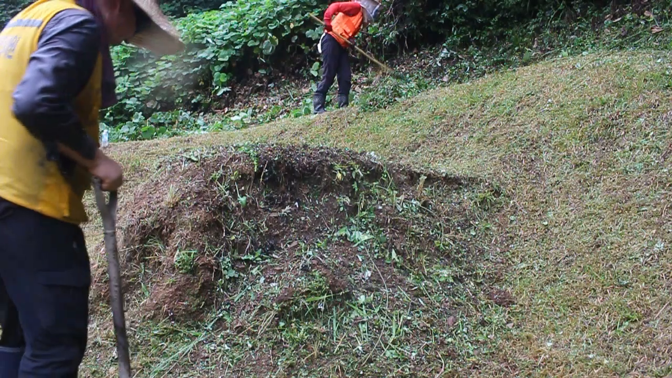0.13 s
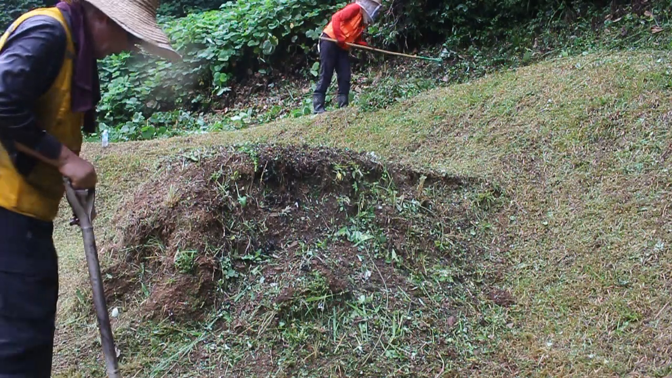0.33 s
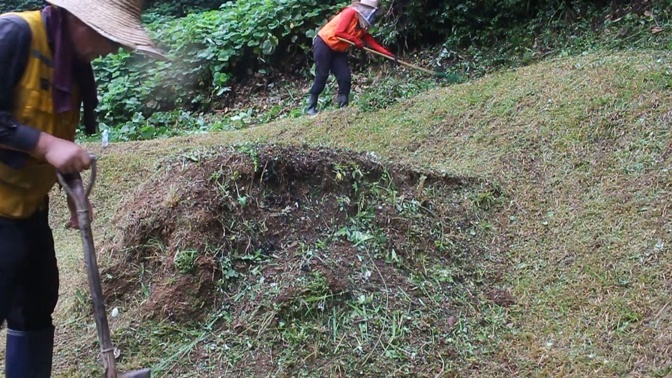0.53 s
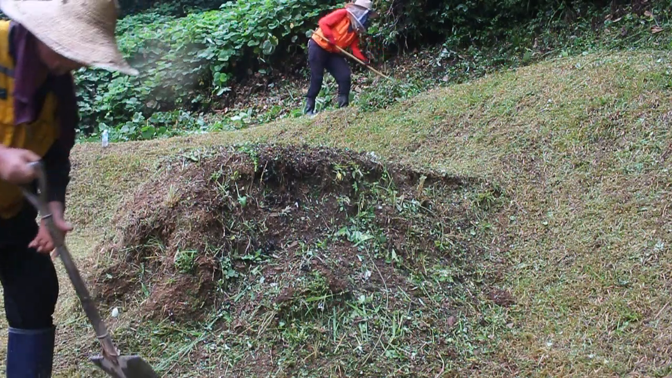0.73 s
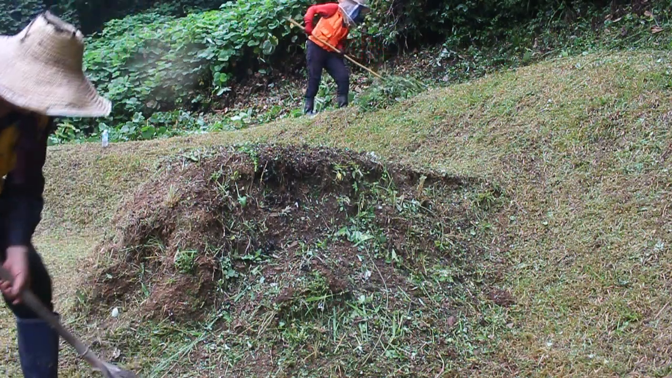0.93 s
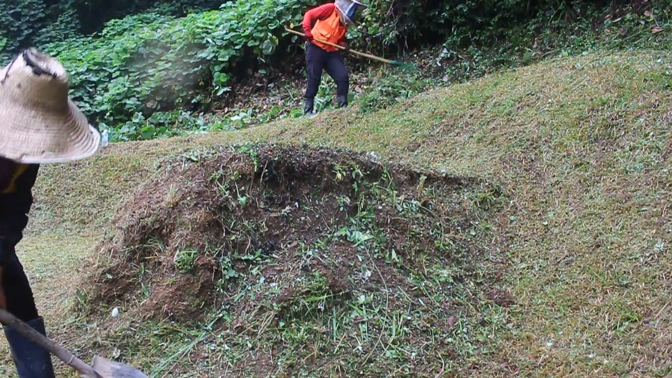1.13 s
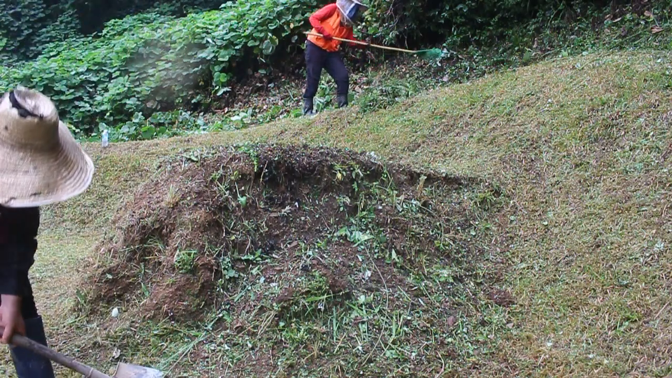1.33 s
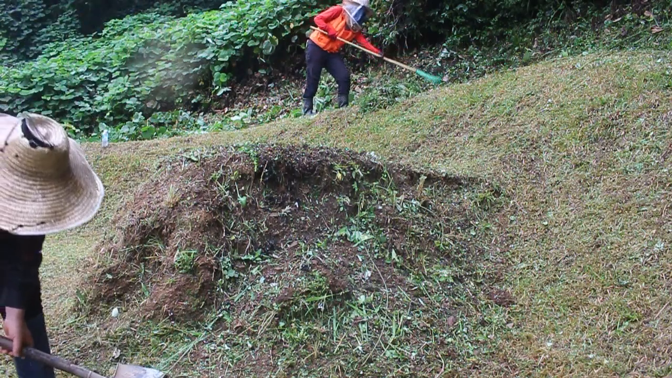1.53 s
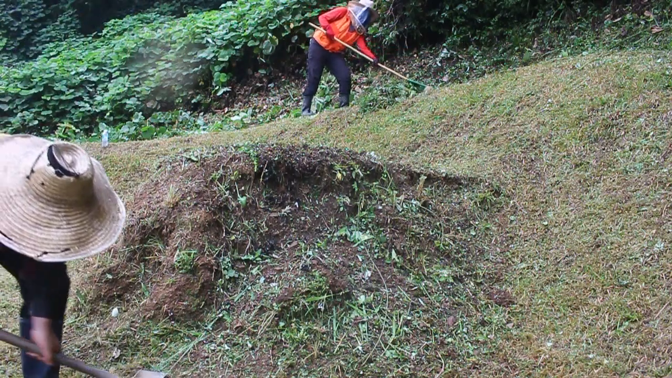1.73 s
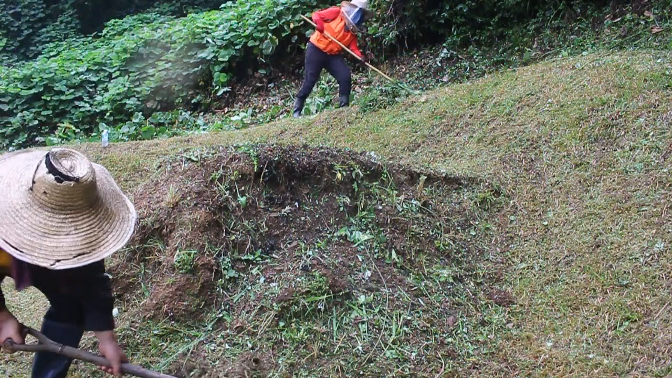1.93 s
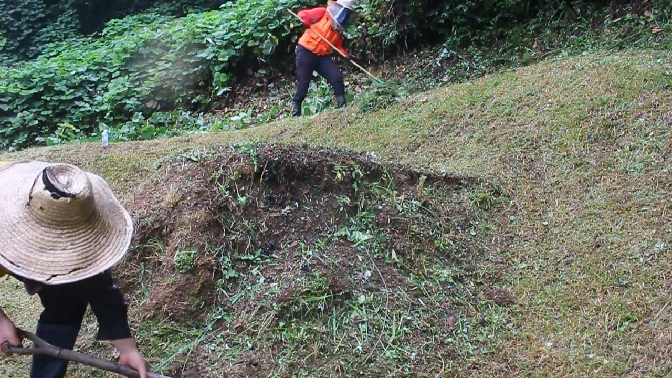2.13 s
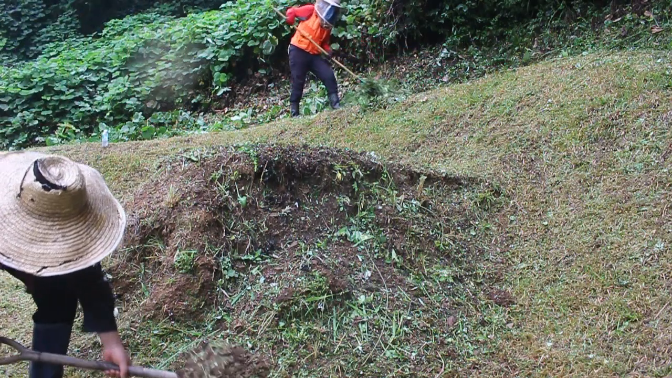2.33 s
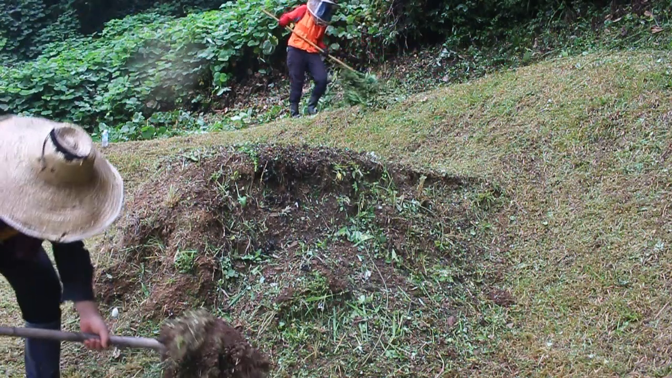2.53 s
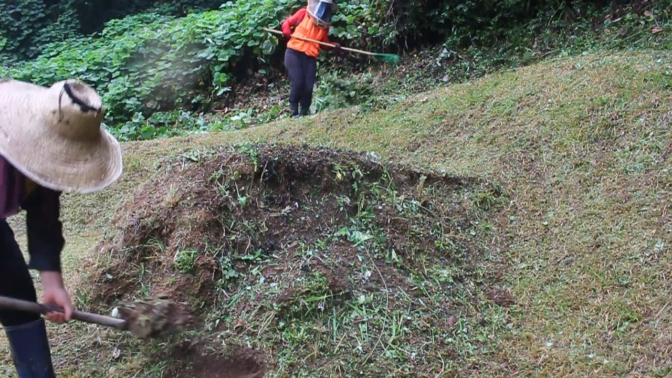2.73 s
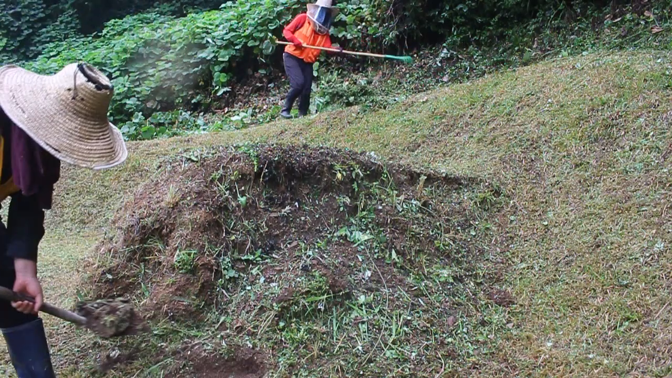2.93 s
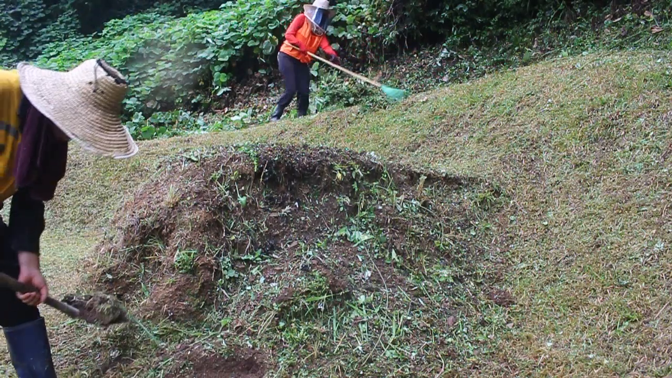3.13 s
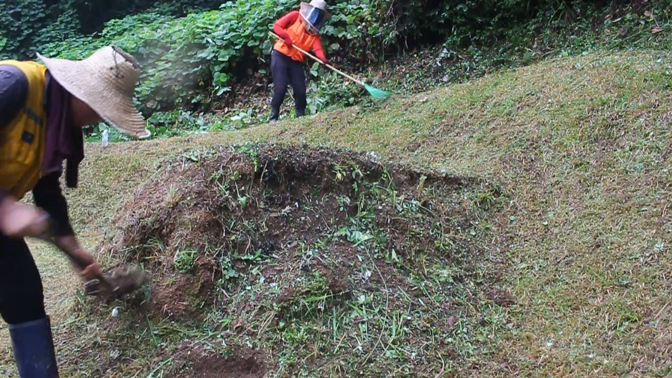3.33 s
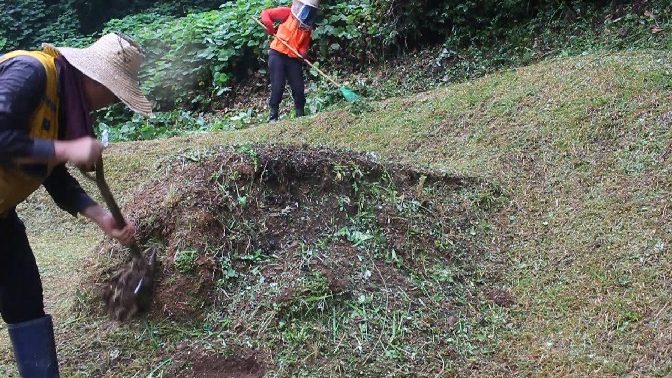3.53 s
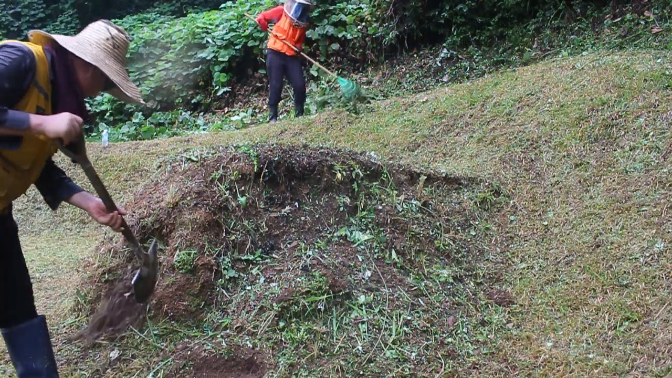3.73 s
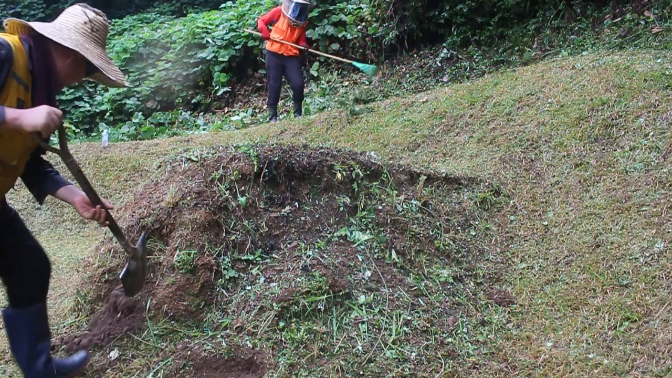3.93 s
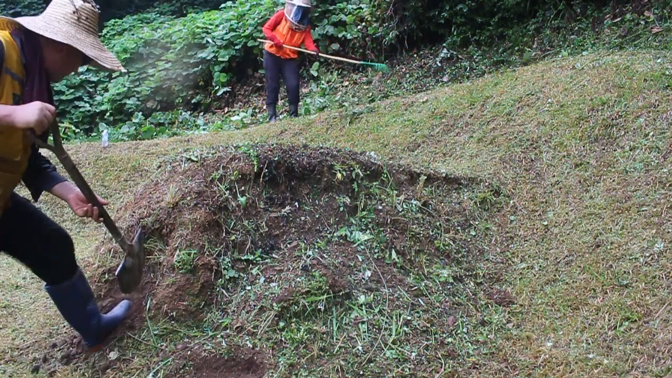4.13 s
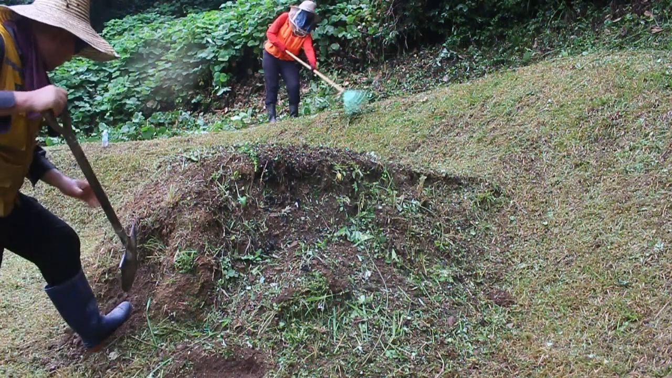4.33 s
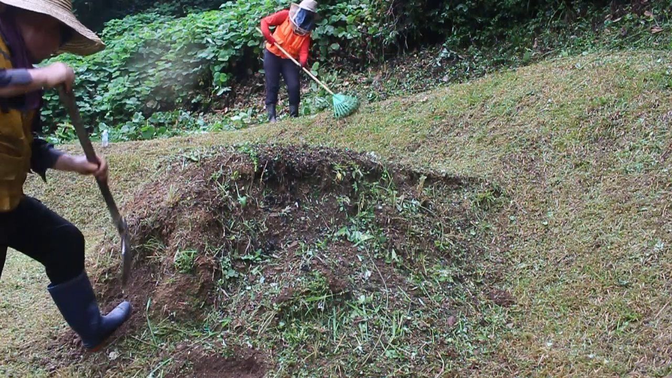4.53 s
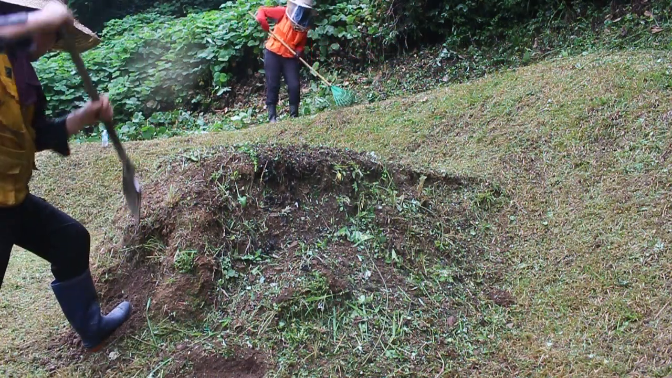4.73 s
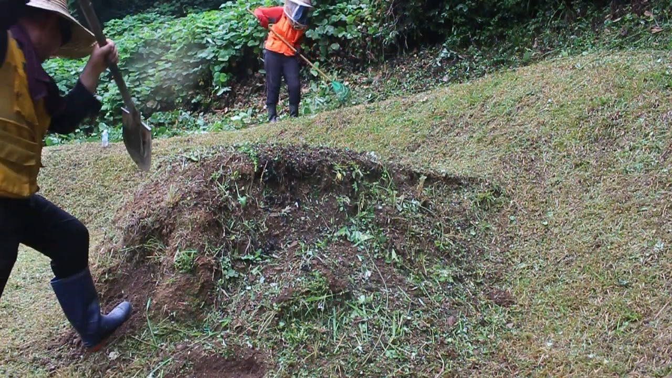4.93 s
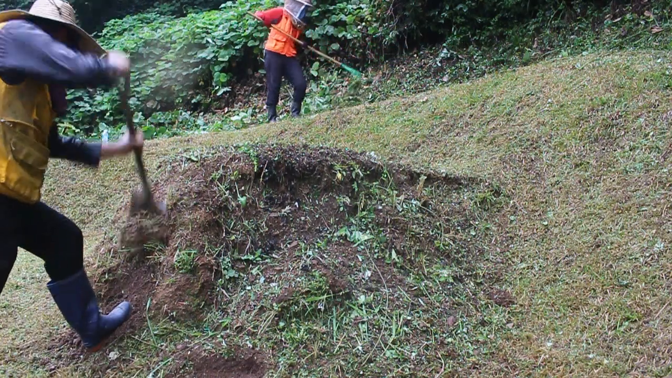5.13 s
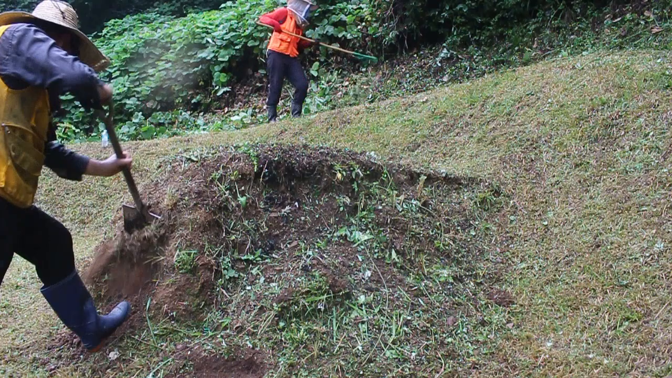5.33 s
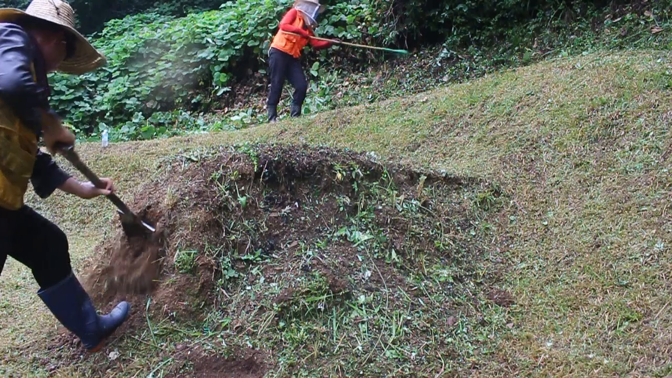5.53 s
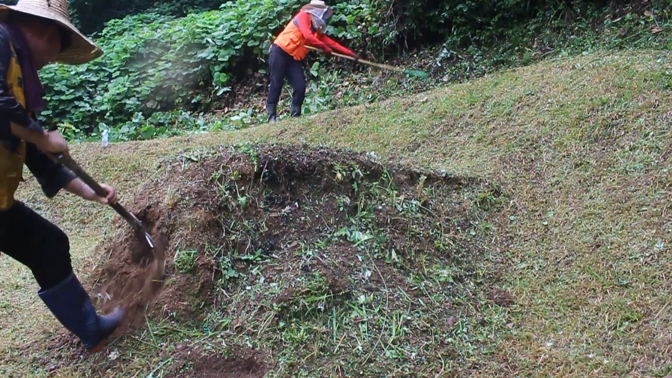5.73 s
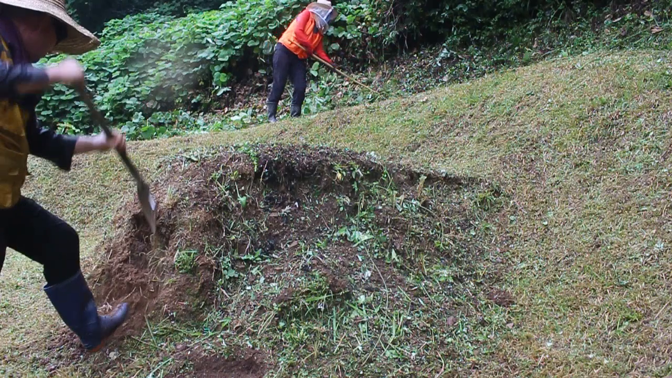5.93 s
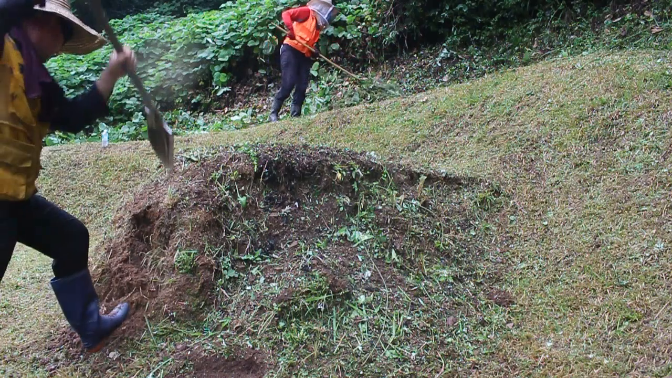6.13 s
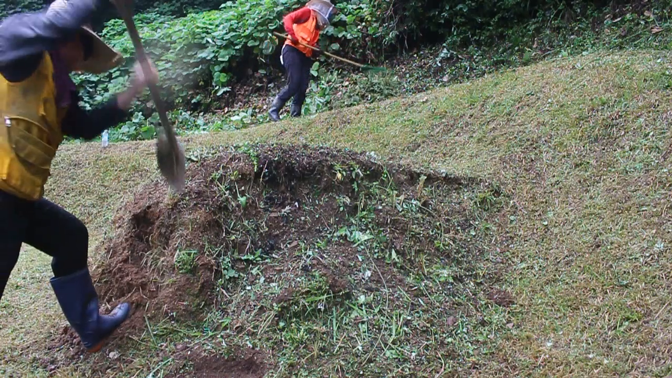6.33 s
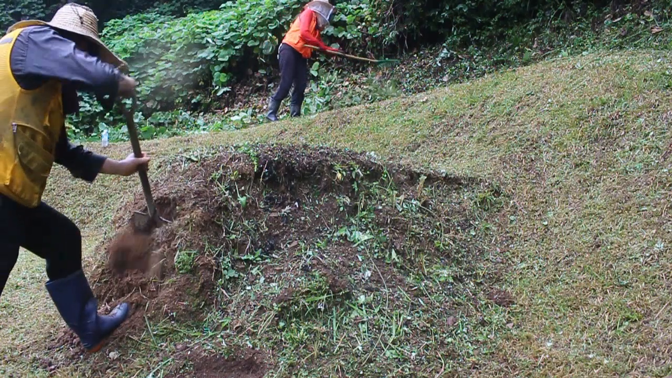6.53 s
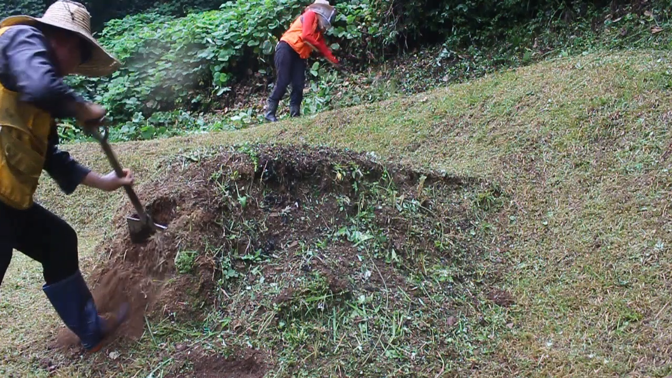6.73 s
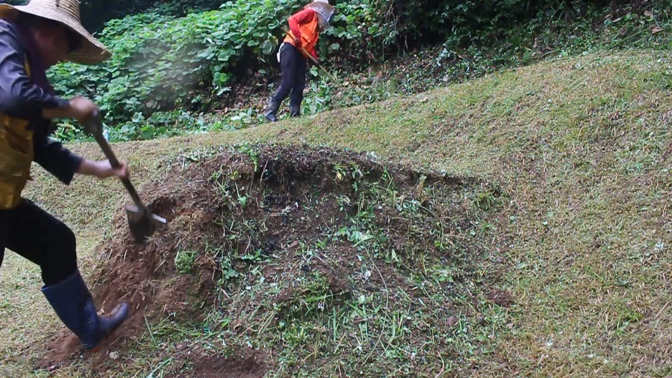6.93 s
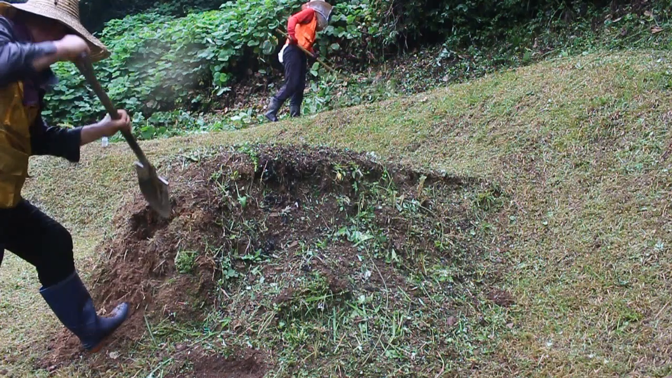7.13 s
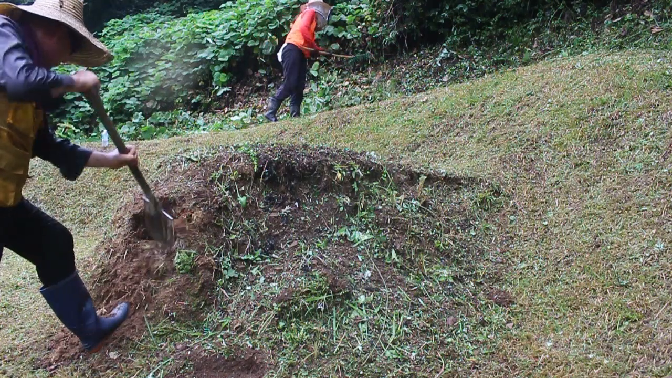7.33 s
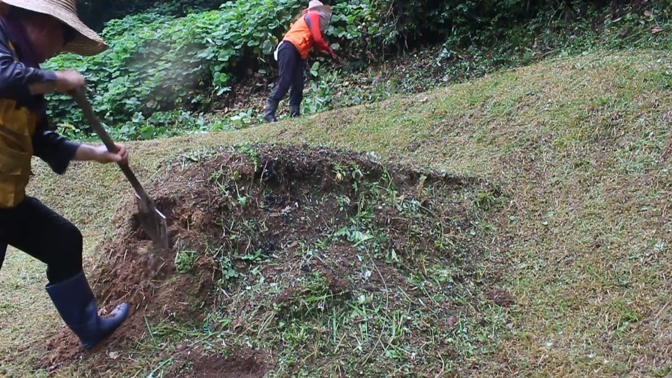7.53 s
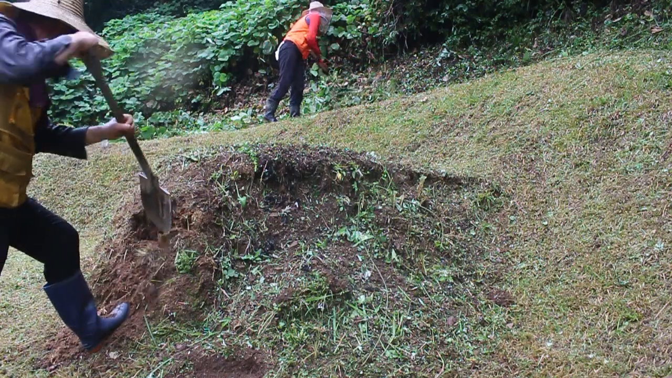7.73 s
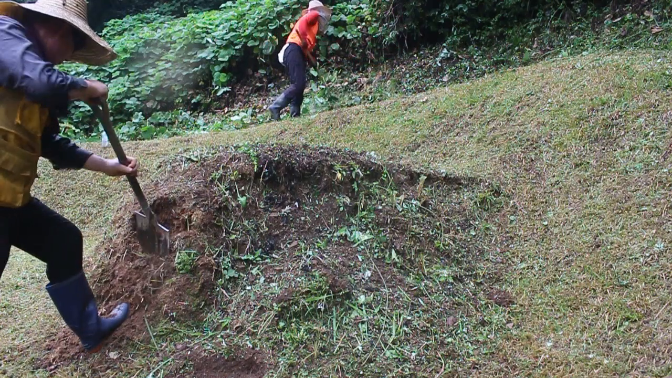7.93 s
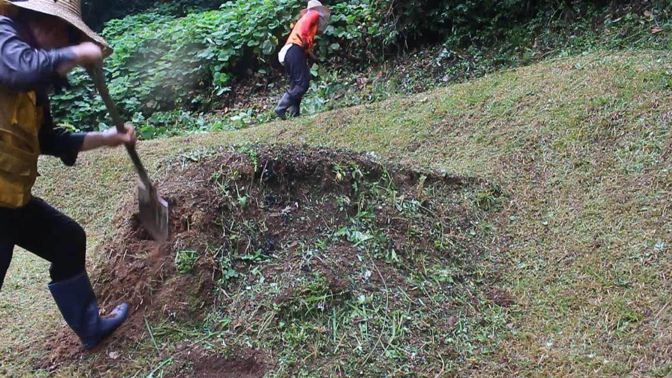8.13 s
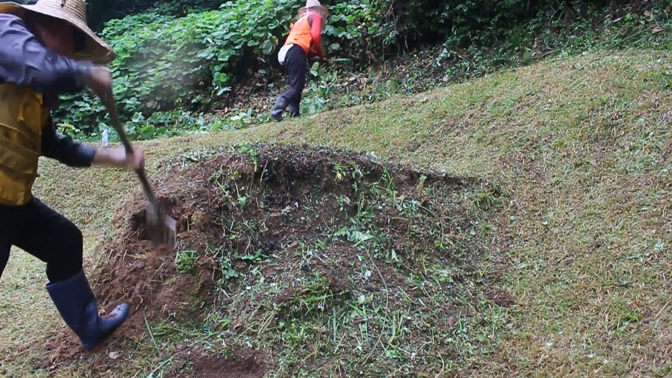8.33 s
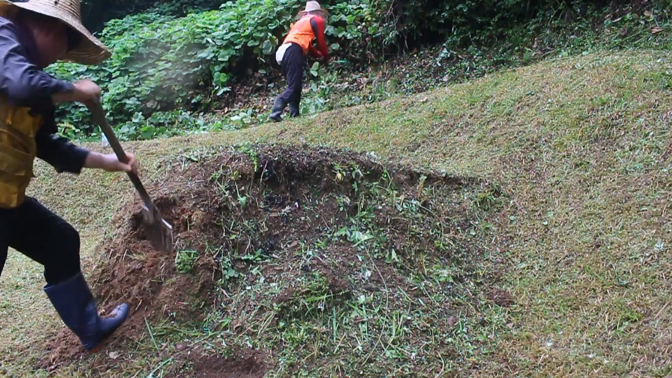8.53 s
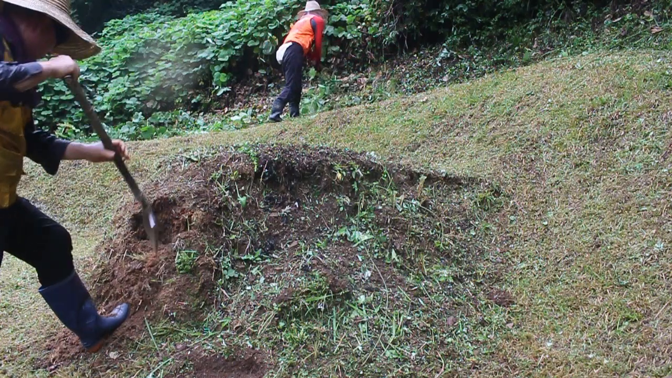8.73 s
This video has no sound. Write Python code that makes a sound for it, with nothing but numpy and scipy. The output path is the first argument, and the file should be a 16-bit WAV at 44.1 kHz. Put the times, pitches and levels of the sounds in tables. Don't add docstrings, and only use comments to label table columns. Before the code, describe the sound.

A close, dry, nearly mono outdoor sound of a shovel in stony soil. From 0 to 1 second the blade drags lightly through turf, with a sharp stone knock at 0.3. A short crunch at 1.3 leads to a dense grinding push at 1.7-2.0, full of cracking pebbles. Softer drags follow, with a faint bee hum around 2.3-2.8 and a weaker one near 4.5. At 3.5-3.7 gritty scrapes leave the steel briefly ringing; then it is mostly quiet, with small knocks. A hard stab crunches at 5.15, lighter scrapes follow to 5.9, and the loudest stab, with clustered stone knocks, hits at 6.43-6.55. Soil crumbles down. A dry double clack on buried rock comes at 7.43, then sandy skims at 7.9 and, stronger, 8.4, ending in light scrapes. Thin high cicadas and soft air hiss continue throughout, the highest chorus fading after 5.

```python
import sys
import numpy as np
from scipy import signal
from scipy.fft import rfft, irfft
from scipy.io import wavfile
from scipy.ndimage import uniform_filter1d

SR = 44100
rng = np.random.default_rng(int(sys.argv[2]) if len(sys.argv) > 2 else 0)


def to_wav(s):
    ch = np.atleast_2d(s).T
    pcm = np.round(np.clip(ch, -1, 1) * 32767)
    wavfile.write(sys.argv[1], SR, pcm.astype(np.int16))


def elevation(decibels):
    levels = np.asarray(decibels, float)
    return 10 ** (levels / 20)


N = 388080
TIME = np.arange(N) / SR
FREQS = np.maximum(np.arange(N // 2 + 1) * SR / N, 1)

# (t/s, grit level/dB, swell/s, fade/s, hold/s)
PUSHES = [
    (1.265, -28, .06, .065, .046),
    (1.73, -34, .03, .3, .001),
    (1.85, -24.3, .14, .17, .042),
    (5.156, -19.5, .006, .028, .08),
    (6.426, -16.5, .009, .03, .07),
    (6.543, -28.5, .13, .05, .001),
]
SAG_DB_PER_S = 105
# (t/s, grit level/dB, swell/s, fade/s)
DRAGS = [(.05, -54, .6, .6), (.279, -40, .23, .45), (.71, -51, .07, .9), (.954, -38.5, .04, .1),
         (1.109, -39.5, .26, .3), (2.111, -40, .21, .4), (2.6, -58, .6, .6), (2.909, -36.5, .17, .26),
         (3.46, -38, .015, .25), (3.55, -41, .03, .3), (3.702, -38, .04, .19), (3.86, -52, .21, .55),
         (4.871, -50, .9, .24)]
# (t/s, grit level/dB, swell/s, fade/s)
SCRAPES = [(3.49, -39, .05, .05), (4.466, -45, .01, .15), (5.29, -54, .05, .6), (5.54, -46.5, .23, .45),
           (5.633, -37.5, .08, .22), (5.724, -32.5, .035, .04), (5.865, -42, .055, .22),
           (7.744, -46.5, .21, .15), (8.116, -47.5, .13, .21), (8.598, -45, .1, .09), (8.77, -45, .17, .3)]
# (t/s, grit level/dB, swell/s, fade/s)
SKIMS = [
    (3.628, -32, .09, .04),
    (7.04, -45, .21, .12),
    (7.306, -40, .01, .28),
    (7.895, -32, .055, .08),
    (8.372, -34, .015, .12),
    (8.4, -26, .04, .05),
    (8.421, -23.5, .035, .03),
]
# (t/s, grit level/dB, swell/s, fade/s)
CRUMBLES = [(1.9, -40, .2, .17), (4.163, -42, .03, .05), (5.41, -54, .21, .45), (5.99, -53, .1, .6),
            (6.62, -57, .05, .21), (6.76, -42, .06, .2), (6.83, -45, .07, .1), (6.94, -42.5, .1, .15),
            (7.22, -51, .45, .45), (7.46, -53, .21, .15)]
# (clods level/dB, pebbles level/dB, fine sand level/dB)
SOILS = [
    (-23, -8, -4.5),
    (-10, -4, -6),
    (-21, -11, -8),
    (-26, -10, .5),
    (-5, -.6, -10),
]
# (f/Hz, level/dB per Hz)
GRIT_COLOUR = [(35, -54), (60, -25), (371, -7), (503, -6), (803, -9), (946, -11), (1110, -8.5), (1660, -2),
               (1820, -5.5), (3340, -6), (10300, -7.5), (13900, -16), (16000, -31)]
# (f/Hz, width/Hz, level/dB)
BLADE_MODES = [(575, 106, -5), (782, 89, -2), (1130, 60, -4.5), (1374, 92, -1), (1510, 44, 1),
               (1690, 58, -5), (2015, 160, 0.5), (2290, 54, 2), (2800, 49, 0), (3030, 50, 2),
               (3270, 70, -3), (3680, 50, -5), (4280, 55, -15), (5040, 70, -6.5)]

# (t/s, peak level/dB, f/Hz, t60/s)
TURF_STONES = [(.193, -27, 1700, .049), (.259, -32, 1420, .033), (.275, -13.5, 1480, .018),
               (.331, -29.5, 3100, .053), (.946, -29, 3250, .081), (1.299, -19.5, 1530, .081),
               (1.677, -29, 1330, .032), (1.722, -20, 2420, .031), (1.8555, -10, 2030, .025),
               (1.898, -15, 1690, .074), (2.415, -23.5, 1340, .023), (2.597, -37, 1650, .03),
               (2.772, -33, 1480, .042), (2.934, -26, 2320, .044), (3.457, -24, 1250, .027),
               (3.542, -24, 1580, .081), (3.693, -25, 4150, .04), (4.462, -25, 2070, .033),
               (4.867, -35, 3940, .03)]
# (t/s, peak level/dB, f/Hz, t60/s)
BURIED_STONES = [(5.174, -12.5, 1630, .035), (5.204, -15, 1500, .03), (5.394, -34, 2830, .037),
                 (5.513, -33, 1460, .033), (5.532, -31, 2470, .045), (5.558, -31.5, 2800, .037),
                 (6.439, -7, 1120, .026), (6.457, -6, 1430, .027), (6.494, -2, 1550, .028),
                 (6.519, -17, 1540, .033), (6.538, -10.5, 1470, .031), (6.774, -31, 1480, .02),
                 (6.785, -20.5, 1580, .018), (7.512, -18, 2220, .026), (7.74, -32, 3840, .04),
                 (7.952, -30.5, 4970, .043), (8.364, -27, 4670, .051), (8.391, -15, 3220, .04),
                 (8.398, -15, 3000, .033), (8.419, -12, 1500, .038), (8.689, -37, 1870, .028),
                 (8.714, -28, 2140, .05)]
# (t/s, peak level/dB, f/Hz, t60/s)
CHIPS = [(.672, -35, 1630, .032), (1.226, -29, 2200, .04), (1.243, -23, 2190, .09),
         (1.785, -22, 1295, .055), (2.837, -38, 1920, .04), (3.602, -27.5, 3050, .1),
         (3.624, -25, 3000, .04), (4.312, -33, 1020, .029), (5.151, -5.5, 2100, .047),
         (5.612, -32, 2430, .05), (5.626, -29.5, 2240, .046), (5.669, -32, 3530, .03),
         (5.714, -30.5, 1610, .061), (5.858, -30.5, 2790, .061), (5.935, -23, 4840, .013),
         (6.424, -11, 1130, .05), (6.63, -38, 1500, .023), (6.999, -34, 2900, .034),
         (7.309, -28, 3640, .05), (7.375, -31, 1510, .064), (7.726, -35, 1590, .04),
         (7.862, -36, 3630, .065), (7.885, -21.5, 2530, .054), (8.116, -33, 3030, .04),
         (8.538, -31, 1530, .044)]
# (t/s, peak level/dB, f/Hz, t60/s)
CLODS = [(.164, -36, 2500, .036), (.439, -35, 1590, .03), (1.103, -34, 1350, .047), (1.416, -36, 1450, .04),
         (2.062, -26, 1060, .042), (2.091, -33, 1530, .058), (2.741, -41, 1500, .065),
         (3.494, -29, 2230, .037), (3.624, -28, 2900, .037), (3.929, -36, 1580, .035),
         (4.145, -32, 800, .08), (4.242, -31, 958, .025), (5.365, -22, 910, .016), (5.908, -35, 3530, .063),
         (6.73, -35.5, 1670, .035), (6.847, -33, 1690, .032), (6.925, -42, 1970, .032),
         (6.938, -28, 1670, .037)]
# (thud level/dB, snap level/dB)
VOICES = [
    (-21, -18),
    (-23, -15),
    (-27, -5),
    (-5, -16),
]

# (t/s, peak level/dB, f/Hz)
PEBBLE_CRACKS = [(1.2486, -20, 4180), (1.2529, -24, 2200), (1.2651, -22, 4180), (1.2687, -23, 2260),
                 (1.2733, -23, 1360), (1.3131, -25, 1490), (1.745, -28, 1980), (1.7758, -25, 5560),
                 (1.7882, -18, 3510), (1.8008, -23, 3750), (1.8125, -20, 3570), (1.8216, -20, 3660),
                 (1.8315, -20, 1960), (1.838, -16, 2000), (1.8486, -18, 2760), (1.8628, -20, 1940),
                 (1.8711, -22, 1490), (1.8903, -19, 3060), (1.8949, -22, 2630), (1.9024, -19, 2480),
                 (1.9077, -23, 1720), (1.9111, -23, 1640), (1.9301, -25, 3140), (1.9387, -23, 3360),
                 (1.9514, -25, 2130), (1.9573, -27, 4030), (1.969, -28, 3900), (1.9873, -30, 1310),
                 (1.9942, -27, 600), (2.013, -30, 1590), (2.0172, -33, 620), (2.876, -31, 2220),
                 (2.8801, -34, 1490), (2.911, -27, 3550), (2.9288, -32, 1360), (2.9355, -28, 2280),
                 (2.9438, -32, 2630), (2.9646, -34, 5020), (3.4614, -24, 1290), (3.4666, -31, 1290),
                 (3.4965, -30, 3340), (3.5045, -30, 4970), (3.5465, -28, 2200), (3.5516, -25, 2930),
                 (3.5877, -30, 4440), (3.6093, -24, 5040), (3.6263, -20, 3010), (3.6314, -23, 4930),
                 (3.6441, -29, 2860), (3.7093, -27, 4180), (3.7141, -27, 4180), (3.7287, -31, 1590),
                 (5.1564, -5, 2670), (5.1607, -16, 2000), (5.1651, -14, 1590), (5.1717, -8, 3340),
               (5.1902, -18, 2890), (5.1936, -22, 1590), (5.197, -20, 3290), (5.2099, -18, 1360),
               (5.2168, -21, 3340), (5.2302, -19, 2930), (5.2344, -24, 3600), (5.2379, -22, 3120),
               (5.6003, -39, 5060), (5.6119, -32, 2390), (5.6154, -35, 3450), (5.6263, -29, 2300),
               (5.6385, -30, 1440), (5.6689, -34, 2430), (5.6875, -37, 3600), (5.7169, -28, 3640),
               (5.7206, -28, 4440), (5.7345, -30, 3700), (6.4202, -16, 5810), (6.4273, -4, 1380),
               (6.4324, -10, 3600), (6.444, -9, 3190), (6.4503, -14, 2070), (6.4665, -16, 1610),
               (6.4719, -17, 4370), (6.4775, -19, 4070), (6.4892, -12, 5730), (6.4981, -6, 1610),
               (6.5036, -14, 1680), (6.508, -19, 1610), (6.5258, -19, 1590), (6.5421, -20, 1550),
               (6.5532, -25, 3620), (6.5612, -27, 2890), (6.5649, -30, 3420), (7.3111, -28, 4520),
               (7.3148, -26, 3600), (7.3183, -32, 4760), (7.8786, -28, 2710), (7.8924, -23, 2650),
               (7.9039, -27, 3340), (7.9116, -27, 1490), (7.9289, -31, 1570), (8.4031, -22, 1530),
               (8.4135, -18, 2170), (8.4236, -12, 1550), (8.4271, -19, 1590), (8.4346, -24, 1570),
                 (.277, -26, 3500), (5.1485, -24, 2400), (6.776, -30, 4000), (6.802, -30, 1700), (6.811, -33, 1900),
         (7.064, -38, 1100), (7.069, -34, 1300), (7.080, -37, 2600), (7.428, -32, 2600), (7.303, -33, 5000),
         (8.546, -38, 1550)]

# (t/s after first touch, f/Hz, level/dB, t60/s)
ROCK_BOUNCES = [
    (0, 4170, 0, 0.0028),
    (.0003, 1900, 14, 0.002),
    (.0002, 1220, -12, 0.0058),
    (.0013, 2740, -2.5, 0.0061),
    (.0024, 1900, -2.5, .005),
    (.0034, 1460, -7, 0.0059),
    (.0038, 1010, -10, 0.004),
]
# (t/s after first touch, f/Hz, level/dB, t60/s)
GROUND = [
    (.003, 470, -35, .06),
    (.004, 240, -33, .1),
    (.004, 145, -24, .08),
    (.007, 75, -42, .4),
]
# (t/s, f/Hz, level/dB, t60/s)
RINGS = [(0, 2494, -50, 4), (.41, 1570, -54, .4), (.5, 1275, -57, 2.5), (0.498, 1670, -55.5, 2.0),
         (.68, 1578, -54, .6), (3.547, 1583, -37, 0.39), (3.621, 3020, -35, 0.17), (3.605, 2223, -36, .2),
         (3.603, 5050, -33, 0.2), (8.399, 580, -36, .08), (8.42, 630, -20, 0.041), (5.17, 560, -26, .2),
         (6.49, 514, -19.5, 0.079), (6.44, 754, -19.5, 0.09), (3.695, 1583, -38.5, .9),
         (3.696, 4150, -28.5, 0.12), (3.696, 4280, -31, 0.13), (3.693, 3300, -38, 0.14),
         (3.695, 1337, -47, 0.77), (3.693, 1160, -49, 0.58), (5.21, 1480, -30, 0.17),
         (5.155, 2676, -18, .05), (5.158, 2234, -20, .06), (5.165, 1287, -25, .12), (5.17, 3327, -22, .1),
         (5.19, 3241, -28, .15), (5.225, 2950, -28, .1), (6.425, 1384, -16, .04), (6.43, 1114, -16, .1),
         (6.445, 510, -22, .1), (6.44, 2299, -24, .08), (6.44, 3257, -24, .08), (1.263, 1400, -30, .06),
         (5.863, 2770, -37, 0.14), (6.496, 1505, -23.5, 0.21), (6.54, 1520, -38, 0.17),
         (7.886, 1510, -38, 0.22), (8.424, 1502, -25.5, 0.27), (8.421, 3025, -49, .3),
         (8.591, 2090, -41, .15)]

# (f/Hz, width/Hz, level/dB, throb f/Hz, throb depth 0-1)
CICADAS = [
    (6360, 50, -67, 17, 0.5),
    (6600, 60, -68, 17, 0.4),
    (6560, 500, -61.5, 100, .15),
    (8580, 940, -61, 100, 0.3),
    (9480, 900, -66.5, 92, .2),
]
# (t/s, level/dB)
FAR_CHORUS = [
    (0, -1),
    (2.5, 4),
    (4.9, 3),
    (5.2, -19),
    (8.8, -16),
]
# (start t/s, end t/s)
HANDOVER_S = (3.4, 4.6)
# (t/s, f/Hz, level/dB)
BEE_PASSES = [
    [(2.3, 236, -75), (2.4, 236.8, -57), (2.55, 242.3, -55.5), (2.72, 248, -56.5), (2.82, 230, -55)],
    [(4.3, 230, -77), (4.4, 229, -61), (4.55, 234, -63), (4.65, 226, -77)],
]
# (f/Hz, level/dB per Hz)
AIR_COLOUR = [(15, -43), (30, -12), (76, -1.5), (223, 3), (1070, -2.5), (1650, -4.5), (5000, -6.5),
              (5730, -8), (6560, -3), (7310, -14), (8830, -9.5), (10400, -16), (16000, -19.5)]


def unit(x):
    return x / np.sqrt(np.mean(x ** 2))


def decay(t, t60):
    return np.exp(-np.log(1000) * t / t60)


def sine(t, hz):
    return np.sin(2 * np.pi * hz * t)


def colour(x, points):
    hz, db = np.transpose(points)
    gain = elevation(np.interp(np.log(FREQS), np.log(hz), db))
    return irfft(rfft(x) * gain, N)


def band(x, lo_hz, hi_hz):
    sos = signal.butter(2, [lo_hz, min(hi_hz, .45 * SR)], "band", fs=SR, output="sos")
    return signal.sosfilt(sos, x)


def resonate(x, hz, width):
    r = np.exp(-np.pi * width / SR)
    feedback = [1, -2 * r * np.cos(2 * np.pi * hz / SR), r * r]
    return signal.lfilter([(1 - r * r) / 2, 0, (r * r - 1) / 2], feedback, x)


def walk(rate):
    k = int(SR / rate)
    steps = np.repeat(rng.standard_normal(N // k + 1), k)
    return unit(uniform_filter1d(uniform_filter1d(steps, k), k)[:N])


def add(out, s, x):
    i = int(s * SR)
    out[i:i + len(x)] += x[:N - i]


def strokes(rows, share=1):
    power = np.zeros(N)
    for s, db, swell, fade, *hold in rows:
        hold = max(sum(hold), 1e-4)
        at = s + np.cumsum([-3 * swell, 3 * swell, hold, 3 * fade * share])
        end_db = db - SAG_DB_PER_S * hold / share
        near = slice(*np.searchsorted(TIME, at[[0, -1]]))
        power[near] += elevation(2 * np.interp(TIME[near], at, [db - 60, db, end_db, end_db - 60]))
    return power


def grains(per_s, spread_db, tail_s):
    chance, size = rng.random((N, 2)).T
    cracks = (chance < per_s / SR) * elevation(-2 * spread_db * np.log(size + .01))
    puffs = signal.lfilter([1], [1, -np.exp(-1 / (tail_s * SR))], cracks)
    return unit(np.sqrt(puffs) * rng.standard_normal(N))


def scrape():
    kinds = (PUSHES, DRAGS, SCRAPES, SKIMS, CRUMBLES)
    power = np.array([strokes(rows) for rows in kinds])
    brief = np.array([strokes(rows, .7) for rows in kinds])
    clod_db, pebble_db, sand_db = np.transpose(SOILS)
    grit_gain = np.sqrt(power.sum(axis=0))
    clod_gain = np.sqrt(elevation(2 * clod_db) @ power)
    pebble_gain = np.sqrt(elevation(2 * pebble_db) @ power)
    sand_gain = np.sqrt(elevation(2 * sand_db) @ brief)

    slip = elevation(1.2 * walk(60))
    rub = (grains(2200, 2.6, 0.0021) + .5 * grains(600, 2.5, 0.00028)) * slip
    steel = sum(elevation(db + 5 * walk(18)) * resonate(rub, hz, width) for hz, width, db in BLADE_MODES)
    chips = sum(band(grains(500, 2.65, 0.0019), hz, 1.5 * hz) for hz in (1300, 2000, 3100))
    grit = unit(band(colour(rub + 0.6 * unit(chips) * slip, GRIT_COLOUR), 1310, 6900))
    grit = grit + elevation(-5) * unit(steel)
    loaded = np.exp(-((TIME - 1.78) / 0.066) ** 2)
    grit = grit + elevation(.5) * loaded * unit(resonate(rub, 1320, 220))

    clods = unit(band(band(grains(400, 2.8, .004), 87, 570), 53, 550))
    pebbles = unit(band(colour(grains(700, 2.5, 0.0016) * slip, GRIT_COLOUR), 445, 1300))
    fine = 0.31 * rub + 1.5 * grains(4000, 1.7, .0008) * slip
    sand = unit(band(colour(fine, GRIT_COLOUR), 4800, 14800))
    coarse = elevation(-.5) * clod_gain * clods + elevation(-2) * pebble_gain * pebbles
    return elevation(-3) * grit_gain * grit + coarse + elevation(-4) * sand_gain * sand


def knocks():
    out, t = np.zeros(N), TIME[:SR // 8]
    kinds = (TURF_STONES, BURIED_STONES, CHIPS, CLODS)
    hits = [(*row, *voice) for rows, voice in zip(kinds, VOICES) for row in rows]
    bite = 1 - np.exp(-t / .0009)
    late = 1 - np.exp(-t / 0.0017)
    for s, peak_db, hz, t60, thud_db, snap_db in hits:
        noise = rng.standard_normal((3, len(t)))
        tone = sine(t, hz) * decay(t, .45 * t60)
        splinters = unit(band(band(noise[0], 0.39 * hz, 1.88 * hz), 0.44 * hz, 4.2 * hz))
        splinters = splinters * decay(t, 0.94 * t60)
        snap = unit(band(noise[1], 3200, 10100)) * decay(t, 0.88 * t60)
        hollow = 0.74 * sine(t, 340 + 60 * noise[2, 0])
        body = .7 * unit(band(noise[2], 148, 820)) + hollow
        thud = band(body * decay(t, 1.36 * t60) * late, 103, 800)
        strike = bite * (0.66 * tone + .5 * splinters + elevation(snap_db - 1.8) * snap)
        add(out, s, elevation(peak_db) * (strike + elevation(thud_db + 3) * thud))
    return out


def cracks():
    out, t = np.zeros(N), TIME[:SR // 30]
    shape = (1 - np.exp(-t / .0004)) * decay(t, .010)
    for s, peak_db, hz in PEBBLE_CRACKS:
        shards = unit(band(rng.standard_normal(len(t)), .5 * hz, min(2.2 * hz, 8500)))
        add(out, s, elevation(peak_db + 1) * shape * (sine(t, hz) + elevation(-2) * shards))
    return out


def rock():
    out, t = np.zeros(N), TIME[:SR // 4]
    first_touch_s = 7.4331
    for delay, hz, db, t60 in ROCK_BOUNCES + GROUND:
        swell = 1 - np.exp(-t * hz / .7)
        add(out, first_touch_s + delay, -elevation(db) * swell * sine(t, hz) * decay(t, t60))
    return band(out, 55, 9000)


def rings():
    out, t = np.zeros(N), TIME[:SR // 3]
    grip = np.cos(np.pi / 2 * t / t[-1])
    for s, hz, db, t60 in RINGS:
        add(out, s, elevation(db) * grip * sine(t, hz) * decay(t, t60))
    return out * elevation(1.0 * walk(50))


def bee():
    out = 0
    for s, hz, db in map(np.transpose, BEE_PASSES):
        beat_hz = np.interp(TIME, s, hz) * (1 + 0.0075 * walk(25.54))
        phase = 2 * np.pi * np.cumsum(beat_hz) / SR
        wings = sum(np.sin(k * phase) / k ** 1.4 for k in range(1, 8))
        out = out + elevation(np.interp(TIME, s, db, -150, -150) - 1 + 2 * walk(14)) * wings
    return out


def cicadas():
    out = []
    for hz, width, db, throb_hz, depth in CICADAS:
        throb_phase = 2 * np.pi * np.cumsum(throb_hz * (1 + .04 * walk(1.5))) / SR
        throb = 1 + depth * np.sin(throb_phase)
        song = resonate(resonate(rng.standard_normal(N), hz, width), hz, width)
        out.append(elevation(db + 1.2 * walk(2.42)) * throb * unit(song))
    handover_db = 7
    turn_db = handover_db * np.interp(TIME, HANDOVER_S, [-1, .3])
    out[0] = out[0] * elevation(turn_db)
    out[1] = out[1] * elevation(-turn_db - handover_db * .7)
    return sum(out[:-1]) + out[-1] * elevation(np.interp(TIME, *np.transpose(FAR_CHORUS)))


def air():
    hiss = unit(colour(rng.standard_normal(N), AIR_COLOUR))
    bass = band(hiss, 44, 270)
    rustle = elevation(.7 * walk(4))
    return elevation(-51.5) * (hiss * rustle + bass * (elevation(2.1 * walk(1.47)) - 1))


def scene():
    shovel = scrape() + knocks() + cracks() + rock() + rings()
    t = TIME[:SR // 6]
    slope = rng.standard_normal(len(t)) * decay(t, 0.075) * (t > .006)
    echo = elevation(-25) * signal.fftconvolve(shovel, slope / np.sqrt(np.sum(slope ** 2)))[:N]
    mono = shovel + echo + cicadas() + bee() + air()
    return np.array([mono, mono])


def roll_off(x):
    return signal.sosfilt(signal.butter(12, 16510, fs=SR, output="sos"), x)


def record(dry):
    trace = colour(dry[0] * walk(300), [(30, -30), (200, -43), (1000, -33), (4000, -30), (12000, -22)])
    both = np.clip(dry + np.array([trace, -trace]), -.95, .95)
    top = signal.ellip(10, .2, 80, 15800, fs=SR, output="sos")
    mix = signal.sosfilt(top, both)
    return roll_off(mix)


dry = scene()
out = record(dry)
to_wav(out)
```